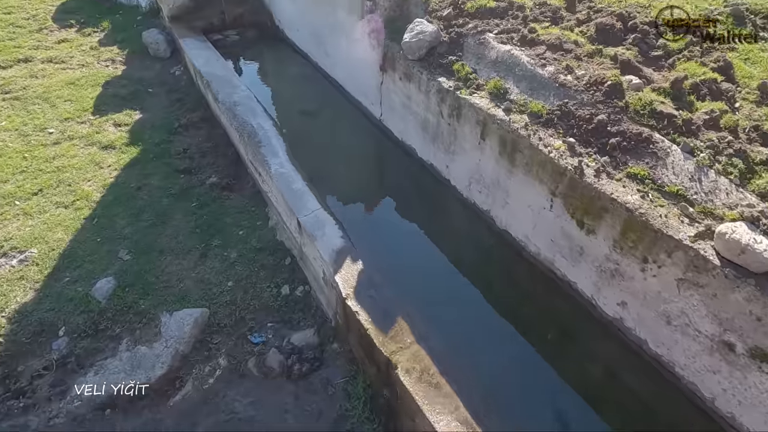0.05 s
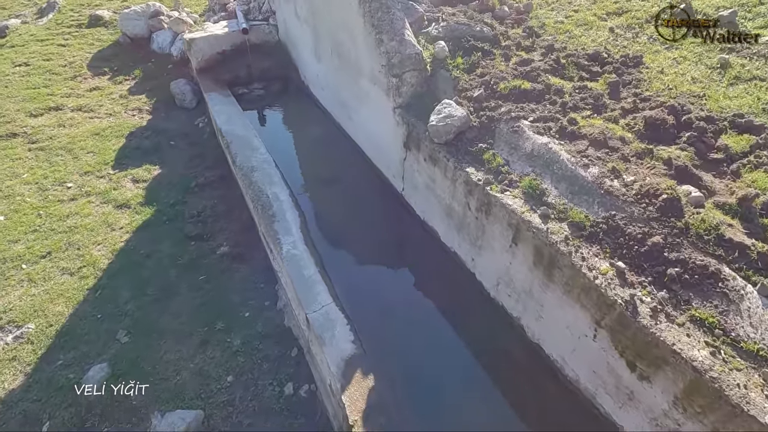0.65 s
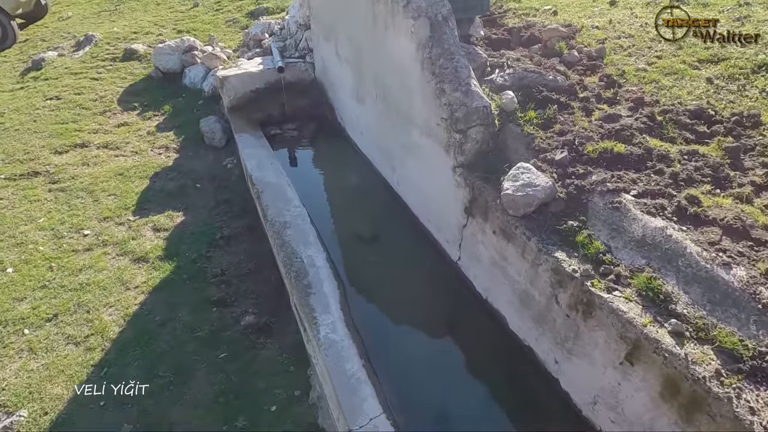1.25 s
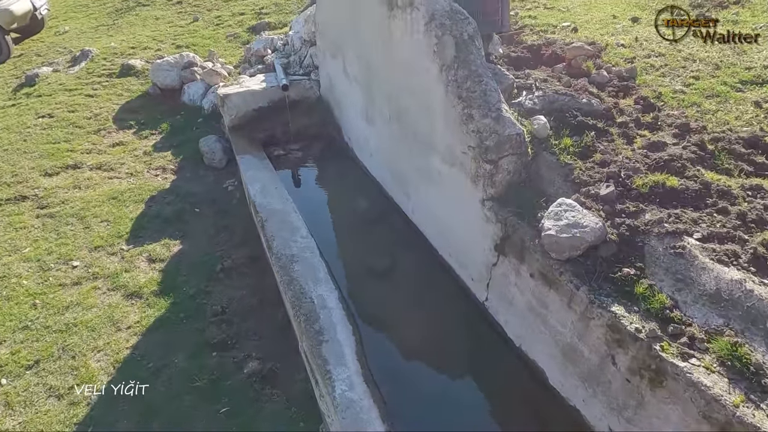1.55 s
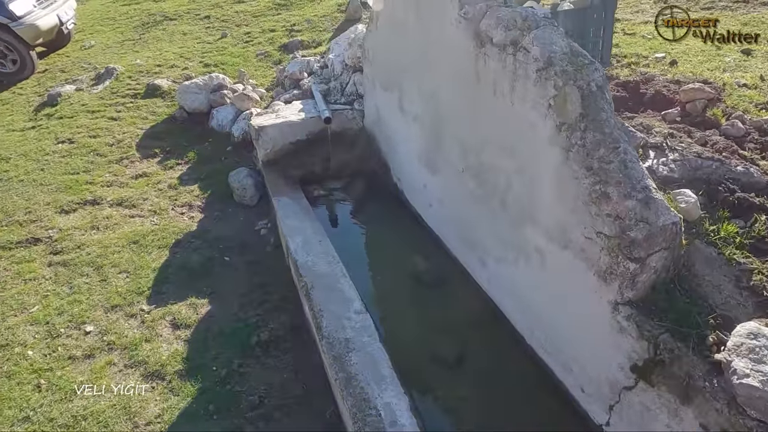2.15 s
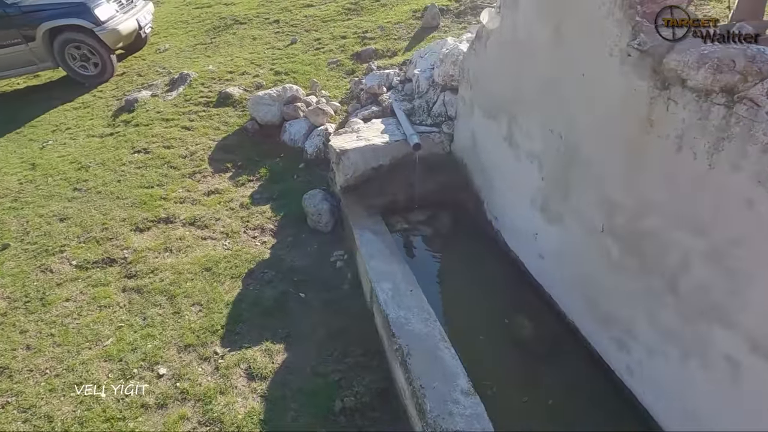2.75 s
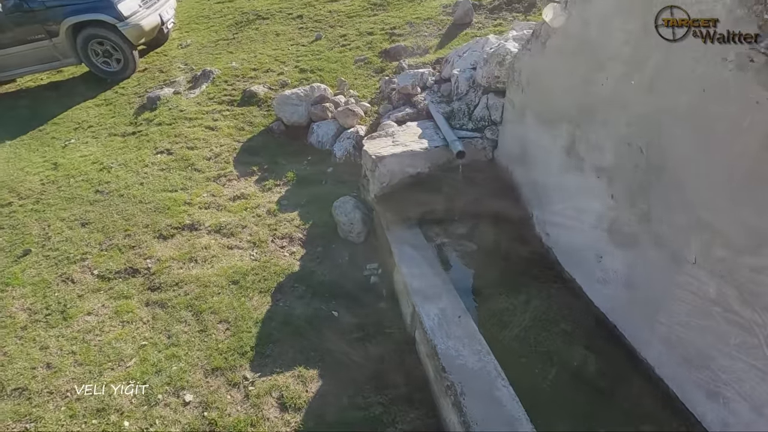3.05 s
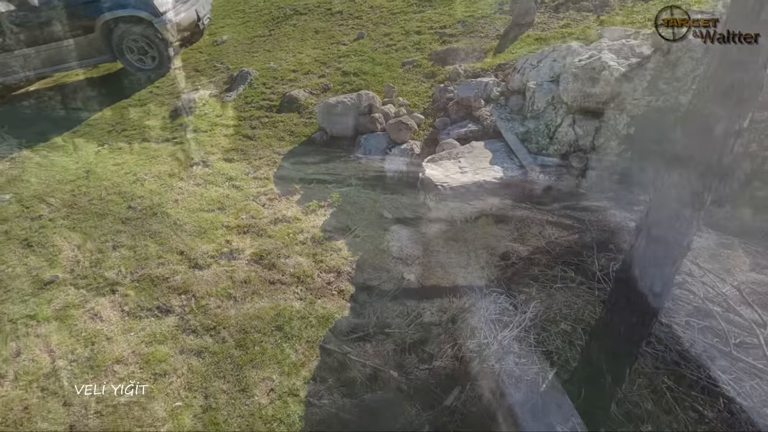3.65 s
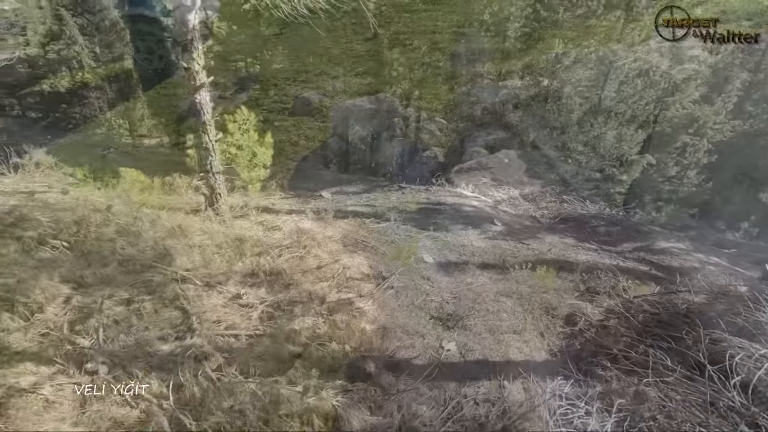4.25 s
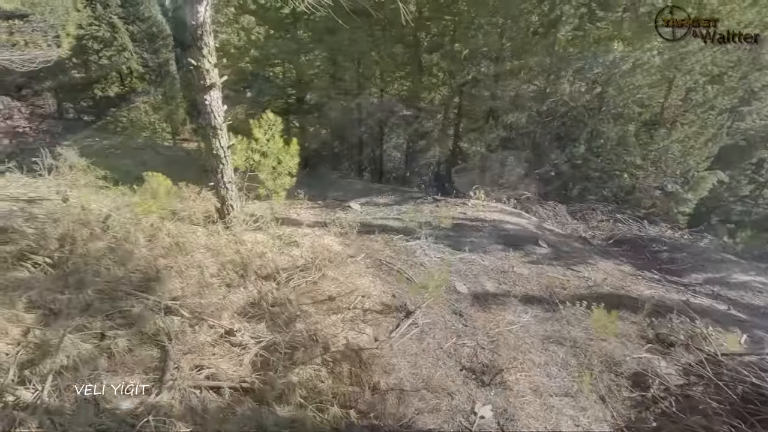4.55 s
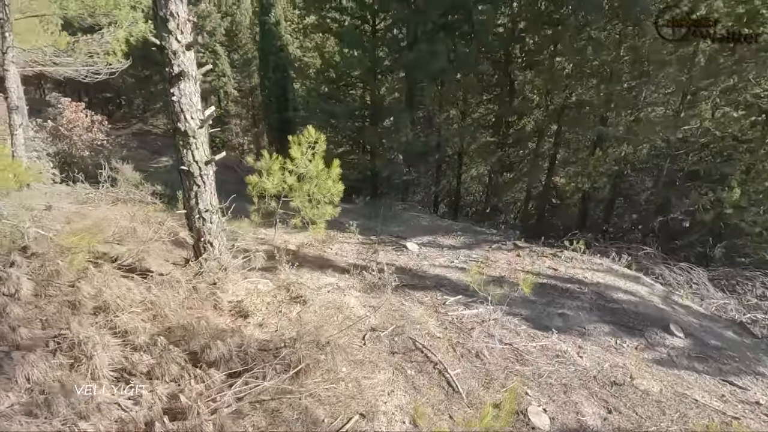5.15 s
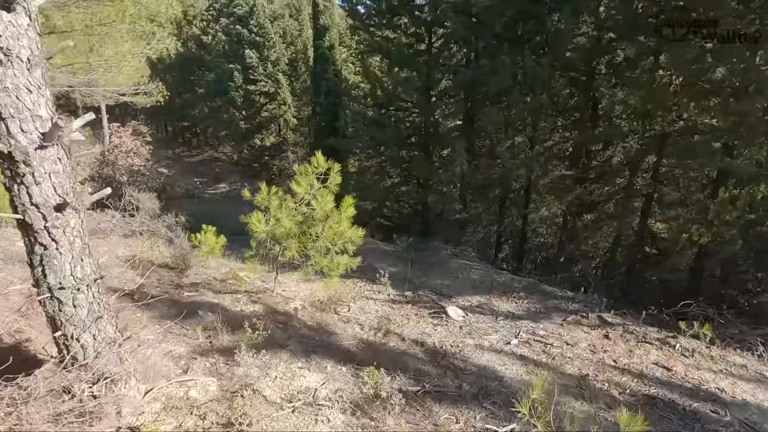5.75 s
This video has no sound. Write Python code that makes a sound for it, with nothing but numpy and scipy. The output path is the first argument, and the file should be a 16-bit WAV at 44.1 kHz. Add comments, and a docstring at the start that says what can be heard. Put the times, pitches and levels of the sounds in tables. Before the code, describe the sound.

A thin stream splashes into a trough, followed by two dog barks and crunching footsteps in a pine wood.

```python
"""Stone trough, then pine wood.

A thin stream from a pipe breaks into blobs that slap the water, throw spray and trap ringing bubbles.
It grows as the microphone nears; a small bird whistles once. The water fades out, a pine wood fades
in: a dog barks twice among echoing trees, wind nudges the microphone, and footsteps crunch on dry
needles and twigs."""
import sys
import numpy as np
from scipy import signal
from scipy.fft import rfft, irfft, next_fast_len
from scipy.io import wavfile
from scipy.ndimage import uniform_filter1d, map_coordinates

SR = 44100
rng = np.random.default_rng(int(sys.argv[2]) if len(sys.argv) > 2 else 0)


def transcribe(u):
    """Save the signal u as a 16-bit wav file named by the first command-line argument.

    u: samples, shape (n,) or (channels, n), limited to [-1, 1]; the rate is SR.
    q: integer samples, one column per channel.
    """
    v = np.clip(np.atleast_2d(u).T, -1, 1)
    q = np.round(v * 32767).astype(np.int16)
    wavfile.write(sys.argv[1], SR, q)


N = 256220
TIME = np.arange(N) / SR

# approach to the pipe: time_s, nearness_db
APPROACH = [(0, -3.5), (0.55, 0), (0.95, -0.5), (1.4, -2), (2.0, 1), (2.5, 2.5), (3.0, 4.5), (3.22, 6.5),
            (3.36, 5), (3.9, 5.5)]
# biggest blobs: start_s, size_db, ring_hz, spray_db
BIG_SPLASHES = [(0.2558, -59, 3300, -78), (0.2902, -53, 3340, -82), (0.375, -52, 4300, -83),
                (0.559, -51, 4570, -64.5), (0.6084, -49.5, 2130, -67), (0.7983, -49, 2290, -84),
                (0.9188, -54, 2480, -69), (0.937, -53, 4020, -67), (0.9595, -39.5, 2385, -66),
                (1.048, -55, 1980, -70), (1.1206, -48.5, 2220, -65.5), (1.16, -53, 3250, -76),
                (1.2018, -52, 3250, -70), (1.239, -54, 3150, -78), (1.271, -53.5, 1950, -72),
                (1.343, -46.5, 3410, -83), (1.3793, -54, 3120, -89), (1.4335, -52, 3270, -90),
                (1.4568, -49, 2580, -84), (1.4694, -52.5, 3030, -81), (1.5269, -55, 3460, -87),
                (1.558, -50, 3500, -83), (1.704, -65, 3040, -70), (1.7459, -43.5, 3130, -76),
                (1.7823, -41, 3190, -66), (2.1919, -42, 3160, -68), (2.2787, -46.5, 2760, -71),
                (2.3637, -46.5, 2730, -69), (2.4065, -45.5, 2840, -75), (2.4467, -56, 2730, -87),
                (2.4663, -46.5, 3660, -86), (2.6175, -43.5, 3540, -73), (2.685, -47.5, 3620, -71),
                (2.722, -46, 3600, -75), (2.785, -46, 3460, -77), (2.847, -43.5, 3600, -76),
                (2.909, -46.5, 3450, -81), (2.92, -44, 3390, -85), (3.12, -46, 3970, -70),
                (3.124, -48.5, 3330, -72), (3.2035, -47.5, 3100, -71), (3.233, -48.5, 2990, -77),
                (3.2465, -56, 3060, -68), (3.299, -67, 3380, -71), (3.3951, -47, 2900, -61),
                (3.4397, -57, 3740, -66), (3.485, -50.5, 2830, -82), (3.602, -43, 2730, -82),
                (3.6646, -59, 3480, -69.5), (3.7368, -45.5, 2334, -72), (3.758, -50, 3480, -60)]
# distinct bubbles, from low plops to tiny high plinks: start_s, peak_db, pitch_hz
BUBBLE_RINGS = [(0.184, -52, 2050), (0.219, -54, 7200), (0.336, -55, 5700), (0.375, -41.5, 512),
                (0.512, -42, 403), (0.596, -44.5, 447), (0.701, -45, 1320), (0.765, -42.5, 426),
                (0.869, -49, 2240), (0.883, -38.5, 492), (0.921, -37.5, 470), (0.9602, -37.5, 2360),
                (0.961, -49, 7900), (0.987, -53, 2370), (0.99, -39.5, 376), (1.12, -52, 5125),
                (1.2, -52.5, 5500), (1.213, -60, 5770), (1.155, -45, 440), (1.242, -42.5, 463),
                (1.388, -44.5, 490), (1.344, -50.5, 1960), (1.508, -55, 5125), (1.559, -52, 5160),
                (1.559, -47, 905), (1.562, -47, 1240), (1.68, -50, 1160), (1.744, -50, 1940),
                (1.76, -51, 5340), (1.969, -51.5, 5100), (2.012, -41, 350), (2.019, -51, 1820),
                (2.166, -39.5, 430), (2.241, -48, 1800), (2.319, -40, 384), (2.406, -42.5, 850),
                (2.783, -54, 6160), (2.871, -42.5, 830), (3.026, -48, 2240), (3.043, -38, 980),
                (3.146, -38.5, 500), (3.248, -35, 506), (3.394, -51, 6350), (3.409, -57, 7540),
                (3.479, -43, 1076), (3.603, -48, 4100)]
# drifting ring of ordinary blobs: time_s, pitch_hz
BLOB_RING = [(0, 3270), (0.8, 2490), (1.15, 3300), (1.7, 3250), (2.4, 2910), (2.52, 3700), (2.9, 3380),
             (3.3, 3240), (3.8, 3740)]
# crowds of bursting bubbles: start_s, end_s, level_db, middle_hz
BUBBLE_FLURRIES = [(0.02, 0.21, -66, 2000), (0.121, 0.316, -70, 4600), (0.353, 0.405, -70, 4340),
                   (0.732, 0.82, -68, 4380), (0.827, 1.008, -65, 2410), (1.633, 1.705, -64.5, 1700),
                   (2.607, 2.65, -71, 7900), (2.678, 2.94, -71.5, 3500), (3.34, 3.553, -77.5, 9070),
                   (3.359, 3.628, -67, 1470), (3.584, 3.615, -58, 3420), (3.724, 3.759, -60, 3980)]
# air dragged under, hissing as foam: start_s, end_s, level_db
FOAM_SPELLS = [(0.325, 0.707, -61.5), (0.663, 0.984, -60.5), (1.63, 1.76, -61.5), (1.74, 2.27, -61),
               (2.58, 3.206, -65)]
# spectra of the water layers: freq_hz, gain_db
GURGLE_EQ = [(60, -5.5), (100, -5.5), (145, 1.5), (195, -3.5), (262, 2.5), (315, -2), (480, -2.5),
             (570, -8.5), (720, -3.5), (950, -13.5), (1400, -22.5)]
CHURN_EQ = [(90, -10.5), (145, 5), (192, -9.5), (232, 8), (275, 6.5), (320, -4.5), (420, -10), (505, 6.5),
            (560, -2.5), (730, 2.5), (1000, -4.5), (1280, -11.5), (1420, -23), (1700, -30)]
SPLATTER_EQ = [(900, -14.5), (1500, -1), (2200, -2.5), (2700, -2.5), (3400, -3), (4400, -4.5), (5500, -8.5),
               (6800, -22.5), (9000, -38)]
SPRAY_EQ = [(4000, -19.5), (5600, 7), (6800, 4.5), (8000, 5.5), (10000, 3), (11200, -4), (12600, 3.5),
            (15000, -18)]
FOAM_EQ = [(600, 4.5), (1500, -4), (2300, 1), (3400, 1), (4500, -6), (5400, -10.5), (6800, -23.5),
           (8200, -17.5), (10000, -20.5), (14000, -24)]
# directional part of the spray: freq_hz, gain_db
SPARKLE_EQ = [(3400, -39.5), (4300, -7), (5400, -31), (7500, -10.5), (9800, 0), (11500, -5), (13000, 2)]
# reflections off rough wall and trough: freq_hz, gain_db
WALL_EQ = [(1500, -22), (2300, -6), (3600, -6), (4500, -12), (5800, -10), (8000, -16), (11000, -28)]
TROUGH_EQ = [(3000, -0.5), (8000, -2.5)]
# wall reflection, later as the pipe nears: time_s, lag_s
WALL_LAG = [(0, 0.00092), (1.4, 0.00091), (2.2, 0.001), (2.45, 0.0012), (2.9, 0.0013), (3.3, 0.00137),
            (3.6, 0.0017), (3.9, 0.0014)]

# one contour per bark: time_s, effort_db, pitch_hz, roughness
BARK_CONTOURS = [
    [(4.066, -91, 717, 0.5), (4.088, -57.5, 707, 0.6), (4.102, -43, 697.5, 0.37), (4.122, -35.5, 683, 0.22),
     (4.148, -38, 651, 0.4), (4.166, -40, 586, 0.44), (4.184, -44, 565, 0.9), (4.215, -59, 472, 1.2)],
    [(4.44, -74, 600, 0.79), (4.475, -51, 634.5, 0.35), (4.494, -46, 650.3, 0.45), (4.508, -46, 905, 0.75),
     (4.522, -45, 1001, 0.45), (4.548, -42, 1009, 0.2), (4.56, -42.5, 1002, 0.3), (4.581, -47.5, 682, 0.8),
     (4.605, -53, 567, 0.7)],
]
# dog's throat resonances: centre_hz, width_hz, gain_db
FORMANTS = [(667, 130, 2.5), (980, 340, -0.5), (1290, 200, -2), (1720, 285, -0.5), (2025, 120, -8)]
# air in the open mouth: freq_hz, gain_db
RASP_EQ = [(300, -34), (500, -6.5), (660, 2), (880, -1.5), (1250, 1), (1520, -8.5), (1830, 0), (2150, -11),
           (2600, -21), (5000, -52)]
# reverberation of the wood: freq_hz, t60_s
WOOD_DECAY = [(300, 0.44), (650, 0.57), (1000, 0.58), (2000, 0.7), (5000, 0.42)]
# echoes off the slope and the wood's edge: lag_s, gain_db
FAR_ECHOES = [(0.11, -17), (0.172, -24), (0.283, -24)]
# their spectrum: freq_hz, gain_db
ECHO_EQ = [(600, -1.5), (1000, -5), (2000, -4)]

# feet through the litter: start_s, length_s, scuff_db, needles_db
FOOT_STROKES = [(4.106, 0.04, -62, -74.5), (4.154, 0.21, -60.5, -92), (4.38, 0.13, -56, -70),
                (4.495, 0.13, -59, -98), (4.66, 0.19, -67, -92), (4.924, 0.06, -63, -83),
                (4.979, 0.03, -58, -59.5), (5.035, 0.051, -61, -80), (5.155, 0.13, -65, -93.5),
                (5.283, 0.068, -60, -85), (5.367, 0.035, -58, -84), (5.461, 0.16, -66.5, -107),
                (5.718, 0.017, -74, -70), (5.728, 0.041, -62, -79)]
# snapping twigs: start_s, peak_db, pitch_hz
TWIG_SNAPS = [(4.385, -44, 2450), (4.499, -39, 8900), (4.992, -30, 2780), (5.002, -40, 1910),
              (5.054, -42.5, 2570), (5.079, -41, 1880), (5.094, -39, 2380), (5.21, -42.5, 1690),
              (5.301, -38.5, 1160), (5.319, -36, 1050), (5.391, -49, 2800), (5.408, -46, 2200),
              (5.42, -38.5, 1410), (5.45, -46, 2130), (5.465, -47.5, 2920), (5.475, -47, 1830),
              (5.733, -35, 1080), (5.761, -44, 1690)]
# footfalls and handling jolts: start_s, peak_db, pitch_hz, decay_s, crunch_relative_db
FOOT_THUDS = [(4.124, -36, 400, 0.0054, -29), (4.769, -51, 260, 0.0055, -15),
              (4.948, -37.5, 200, 0.0057, -30), (4.99, -17, 192, 0.00099, -29.5),
              (5.0, -24.5, 430, 0.0015, -26.5), (5.301, -32.5, 650, 0.0007, -34),
              (5.331, -34.5, 114, 0.013, -25), (5.334, -35.5, 440, 0.0014, -28),
              (5.418, -35.5, 670, 0.00068, -19.5), (5.712, -42, 220, 0.0028, -21.5),
              (5.731, -43, 680, 0.0017, -7.5), (5.764, -33, 81, 0.022, -33), (5.778, -43, 434, 0.0028, -14)]
# spectra of soles and dry needles: freq_hz, gain_db
SCUFF_EQ = [(100, -6), (250, 6.5), (480, 13.5), (800, 13), (1300, 9.5), (2000, 1), (3500, 2.5),
            (4700, -9.5), (5800, -18), (12000, -40)]
NEEDLES_EQ = [(2000, -6), (4500, 8.5), (7000, 4), (10000, 1), (13000, -4), (15500, -20)]

# bird's whistle: time_s, level_db
WHISTLE_LEVEL = [(2.24, -75), (2.28, -72), (2.335, -56), (2.358, -69), (2.38, -59), (2.44, -61.5),
                 (2.5, -58), (2.53, -72), (2.64, -77)]
# wind rumble: freq_hz, gain_db
WIND_EQ = [(10, -2), (25, 2), (40, -3), (75, -8.5), (120, -17), (170, -21.5), (250, -28), (600, -36),
           (2000, -80.5)]
# gusts: middle_s, level_db, half_width_s
WIND_GUSTS = [(0.03, -48, 0.15), (0.38, -49.5, 0.08), (0.57, -40, 0.045), (1.101, -55.5, 0.18),
              (1.8, -55.5, 0.13), (2.04, -53, 0.062), (2.4, -57, 0.049), (3.16, -49, 0.16),
              (4.14, -51, 0.021), (4.37, -46, 0.18), (4.701, -46, 0.17), (4.9, -46, 0.029),
              (5.01, -38, 0.055), (5.299, -42.5, 0.084), (5.774, -39.5, 0.035)]
# the wood slides from left to centre: time_s, left_minus_right_db
WOOD_PAN = [(4.04, 16.5), (4.15, 15), (4.4, 12), (4.6, 9), (4.8, 5.5), (4.92, 1)]

WATER_OUT_S, WOOD_IN_S = (3.366, 3.949), (4.055, 4.13)
SPLATTER_FOLLOW, SPRAY_FOLLOW = 0.1, 0.05  # dB per dB of nearness


def water():
    """The stream in the trough: big and ordinary blobs within a trickle."""
    splashes, plops = blobs()
    splashes, plops = list(BIG_SPLASHES) + splashes, list(BUBBLE_RINGS) + plops
    return facing(trough(trickle(splashes) + flurries() + drops(splashes, plops)))


def blobs(count=140, rate_hz=25, jitter=0.3, spread_db=3.5, cushion_db=-1, pocket_share=0.65):
    """Splash and plop rows: blobs fall at a loose beat, foam cushions them, some drive air under."""
    gap, size, pitch, mist, depth, pocket = rng.standard_normal((count, 6)).T
    traps_air = rng.random(count) < pocket_share
    start_s = np.cumsum(np.exp(jitter * gap)) / rate_hz
    near_db = curve(APPROACH, start_s)
    heard = start_s < WATER_OUT_S[1]
    on_foam = np.any([(start_s > start) & (start_s < end) for start, end, _ in FOAM_SPELLS], axis=0)
    size_db = spread_db * np.minimum(size, 1.5) + cushion_db * on_foam
    blob_db = -56 + size_db + SPLATTER_FOLLOW * near_db
    spray_db = -76.5 + size_db + 4.3 * mist + SPRAY_FOLLOW * near_db
    ring_hz = curve(BLOB_RING, start_s) * 2 ** (0.08 * pitch)
    pocket_db = -46.5 + 0.44 * depth - 0.69 * near_db
    pocket_hz = 430 * 2 ** (0.097 * pocket)
    splashes = np.array([start_s, blob_db, ring_hz, spray_db]).T
    plops = np.array([start_s, pocket_db, pocket_hz]).T
    return list(splashes[heard]), list(plops[heard & traps_air])


def drops(splashes, plops, rise_s=0.0014, fall_s=0.0026, slap_db=-3.5, plink_db=-3, crest_db=10):
    """Each blob slaps the surface, throws spray and traps a plinking bubble; others ring below."""
    below, surface = np.zeros((2, N))
    t = TIME[:1500]
    for start_s, db, hz, spray_db in splashes:
        slap = rng.standard_normal(len(t)) * (1 - np.exp(-(t / rise_s) ** 2)) * np.exp(-t / fall_s)
        slap = coloured(resonate(slap, hz, width_hz=1700), SPLATTER_EQ)
        add(surface, start_s, gain_of(db + slap_db) * unit_peak(slap))
        add(surface, start_s, gain_of(spray_db + crest_db) * droplets())
        add(below, start_s, gain_of(db + plink_db) * ring(hz, cycles=9, rise=0.008, attack=6))
    for start_s, db, hz in plops:
        cycles = 2.01 * (hz / 450) ** 0.41  # smaller bubbles ring for more cycles
        add(below, start_s, gain_of(db) * ring(hz, cycles, rise=0.014, attack=0.51 * cycles))
    return below + off_wall(surface)


def droplets(count=26, low_hz=5000, high_hz=13500, span_s=0.008, tick_s=0.0013):
    """One blob's spray: a dry contact tick among tiny pings, peak 1."""
    t = TIME[:1500]
    pings = np.zeros(len(t))
    for pitch, early, late, size in rng.random((count, 4)):
        hz = low_hz * (high_hz / low_hz) ** pitch
        add(pings, span_s * early * (1 + late) / 2, size * ring(hz, cycles=6, rise=0.01, attack=4))
    tick = rng.standard_normal(len(t)) * np.exp(-abs(t - span_s / 2) / tick_s)
    return unit_peak(coloured(unit_peak(pings) + gain_of(-3) * unit_peak(tick), SPRAY_EQ))


def trickle(splashes):
    """Clouds of bubbles and droplets over foam; the higher ones thicken around each blob."""
    gush = gush_gain(splashes)
    gurgle = grains(94, 1074, per_s=1500, spread_db=2, cycles=2.01, rise=0.17, attack=0.91)
    churn = grains(117, 1566, per_s=5000, spread_db=-1, cycles=4.7, rise=0.057, attack=1.15)
    bubbles = grains(916, 1200, per_s=990, spread_db=10, cycles=1.4, rise=0.041, attack=0.75)
    splatter = grains(1426, 6620, per_s=2700, spread_db=5.5, cycles=6.2, rise=0.013, attack=1.2)
    spray = grains(5500, 14000, per_s=5000, spread_db=3.6, cycles=3.5, rise=0.015, attack=3)
    hiss = foam()
    clumps = lumps(spread_db=1.98, length_s=0.027)
    return (nearer(-55.5, follow=0.84) * steadied(coloured(gurgle, GURGLE_EQ) * clumps)
            + nearer(-63.5, follow=2.44) * steadied(coloured(churn, CHURN_EQ))
            + nearer(-74.5, follow=1.54) * steadied(bubbles * gush)
            + nearer(-68, SPLATTER_FOLLOW) * steadied(off_wall(coloured(splatter, SPLATTER_EQ) * gush))
            + nearer(-69.5, follow=0.25) * patter(gush)
            + nearer(-78.5, SPRAY_FOLLOW) * steadied(coloured(spray, SPRAY_EQ) * gush)
            + hiss)


def gush_gain(splashes, boost=3.9, decay_s=0.0021):
    """Burst of droplets around each blob, stronger for big ones."""
    start_s, db = np.transpose(splashes)[:2]
    kicks = np.zeros(N)
    kicks[np.clip(np.round(start_s * SR).astype(int), 0, N - 1)] = np.sqrt(gain_of(db - db.max()))
    lag_s = np.arange(-1500, 1501) / SR
    return 1 + boost * signal.oaconvolve(kicks, np.exp(-abs(lag_s) / decay_s), "same")


def patter(gush):
    """Tiny bubbles crowd around each blob and ring near its pitch."""
    pops = grains(2200, 4600, per_s=700, spread_db=5.5, cycles=1.2, rise=0, attack=0.3, count=8)
    return steadied(resonate_twice(pops * gush, curve(BLOB_RING), width_hz=600))


def flurries(count=14, pitch_ratio=1.186, rise_s=0.0068, fall_s=0.0084):
    """Short crowds of bubbles of about one size."""
    out, t = np.zeros(N), TIME[:SR // 2]
    for start_s, end_s, db, middle_hz in BUBBLE_FLURRIES:
        crowd = np.zeros(len(t))
        for hz in np.geomspace(middle_hz / pitch_ratio, middle_hz * pitch_ratio, count):
            pops = sparse_noise(len(t), chance=middle_hz / 40 / SR)
            crowd += signal.oaconvolve(pops, ring(hz, cycles=6, rise=0.01, attack=2))[:len(t)]
        envelope = spell(0, end_s - start_s, rise_s, fall_s)[:len(t)]
        add(out, start_s, gain_of(db) * envelope * steadied(crowd, size=1800))
    return out


def foam(rest_db=-74.5, rise_s=0.012, fall_s=0.064):
    """Hiss that swells while the stream drags air under."""
    hiss = unit_rms(coloured(rng.standard_normal(N), FOAM_EQ))
    swells = [gain_of(db) * spell(start, end, rise_s, fall_s) for start, end, db in FOAM_SPELLS]
    return np.maximum(np.max(swells, axis=0), gain_of(rest_db)) * hiss


def off_wall(x):
    """One close reflection cuts the sound into bands, which sink as the lag grows."""
    return x + map_coordinates(coloured(x, WALL_EQ), [(TIME - curve(WALL_LAG)) * SR], order=3)


def trough(x, patterns=6, t60_s=0.17):
    """Short, shifting reflections off the stone sides; several echo patterns alternate at random."""
    t = TIME[:4000]
    pattern = rng.integers(0, patterns, N // 1024 + 1)[np.arange(N) // 1024]
    echoes = np.zeros(N)
    for k in range(patterns):
        taps = sparse_noise(len(t), chance=0.03) * (t > 0.003) * gain_of(-60 * t / t60_s)
        active = uniform_filter1d(1. * (pattern == k), size=256)
        echoes += signal.oaconvolve(x * active, taps / np.linalg.norm(taps))[:N]
    return x + gain_of(-7.5) * coloured(echoes, TROUGH_EQ)


def facing(x, turn_s=(2.65, 3.6), away_db=-8.5, facing_db=5):
    """The finest spray comes up as the microphone turns to the pipe."""
    sparkle_gain = gain_of(np.interp(TIME, turn_s, [away_db, facing_db]))
    return x + (sparkle_gain - 1) * coloured(x, SPARKLE_EQ)


def nearer(base_db, follow):
    """Layer gain, rising by follow dB per dB of nearness."""
    return gain_of(base_db + follow * curve(APPROACH))


def dog(scatter_db=-7):
    """Barks, scattered by the trunks, with a few distinct echoes."""
    direct = np.zeros(N)
    for contour in BARK_CONTOURS:
        add(direct, *bark(contour))
    taps = sparse_noise(SR, chance=0.04) * (TIME[:SR] > 0.025)
    hz, t, spectra = signal.stft(taps, SR, nperseg=256)
    decay = gain_of(-60 * t / at_hz(WOOD_DECAY, hz)[:, None])
    tail = signal.istft(spectra * decay, SR, nperseg=256)[1]
    out = direct + gain_of(scatter_db) * signal.fftconvolve(direct, tail / np.linalg.norm(tail))[:N]
    for lag_s, db in FAR_ECHOES:
        add(out, lag_s, gain_of(db) * coloured(direct, ECHO_EQ))
    return out


def bark(contour):
    """Start time and sound of a yelp turning hoarse: harmonics through the throat, plus puffs of air."""
    time_s, *columns = np.transpose(contour)
    t = np.arange(time_s[0], time_s[-1], 1 / SR)
    effort_db, hz, rough = (np.interp(t, time_s, column) for column in columns)
    rough = np.clip(rough, 0.12, 1)
    jitter, air, shimmer = rng.standard_normal((3, SR))[:, :len(t)]
    turns = np.cumsum(hz * (1 + 0.09 * rough ** 1.5 * wobble(jitter, size=90))) / SR
    folds = sum(gain_of(-4.5 * k) * np.cos(2 * np.pi * (k + 1) * turns) for k in range(3))
    folds *= 1 + 0.64 * rough * np.cos(np.pi * turns)  # alternate pulses are weaker
    folds *= 1 + 0.7 * rough * wobble(shimmer, size=120)
    tone = sum(gain_of(db) * resonate_twice(folds, centre, width) for centre, width, db in FORMANTS)
    puffs = (0.37 + np.exp(-(turns % 1) / 0.26)) * air
    growl = resonate_twice(puffs, hz, width_hz=170)
    rasp = unit_rms(coloured(puffs, RASP_EQ)) + 0.6 * unit_rms(growl)
    voice = np.sqrt(1 - rough ** 2) * steadied(tone, size=900) + rough * unit_rms(rasp)
    return time_s[0], gain_of(effort_db) * voice * signal.windows.tukey(len(t), 0.12)


def footsteps(rustle_db=-74.5, rise_s=0.017):
    """Soles scuff and thud, needles crackle, twigs snap."""
    drag = gain_of(1.5 * wobble(rng.standard_normal(N), size=300))
    scuff = coloured(rng.standard_normal(N), SCUFF_EQ) * drag
    needles = grains(3000, 14500, per_s=4500, spread_db=3.6, cycles=1.2, rise=0, attack=0.3)
    scuff_gain, needles_gain = gain_of(rustle_db), 0
    for start_s, length_s, scuff_db, needles_db in FOOT_STROKES:
        stroke = (start_s, start_s + length_s, rise_s)
        scuff_gain = np.hypot(scuff_gain, gain_of(scuff_db) * spell(*stroke, fall_s=0.024))
        needles_gain = np.hypot(needles_gain, gain_of(needles_db) * spell(*stroke, fall_s=0.027))
    out = scuff_gain * unit_rms(scuff) + needles_gain * steadied(coloured(needles, NEEDLES_EQ))
    for start_s, db, hz in TWIG_SNAPS:
        add(out, start_s, gain_of(db) * ring(hz, cycles=0.43, rise=0, attack=0.56))
    for start_s, db, hz, decay_s, crunch_db in FOOT_THUDS:
        add(out, start_s, gain_of(db) * thud(hz, decay_s, crunch_db))
    return out


def thud(hz, decay_s, crunch_db):
    """A footfall or jolt: damped knock plus crushed litter."""
    t = TIME[:SR // 6]
    press, crush = rng.standard_normal((2, len(t))) * (1 - np.exp(-t / 0.00012))
    crunch = unit_rms(coloured(press, SCUFF_EQ)) * np.exp(-t / 0.02)
    litter = unit_rms(coloured(crush, NEEDLES_EQ)) * np.exp(-t / 0.032)
    out = gain_of(crunch_db) * (crunch + gain_of(-19) * litter)
    add(out, 0, ring(hz, cycles=decay_s * hz, rise=0, attack=0.015))
    return out


def bird(pitch_hz=2708):
    """One thin whistle that wavers and trails off."""
    hz = pitch_hz * (1 + 0.003 * wobble(rng.standard_normal(N), size=400))
    flutter = lumps(spread_db=1.8, length_s=0.01)
    singing = (TIME >= WHISTLE_LEVEL[0][0]) & (TIME <= WHISTLE_LEVEL[-1][0])
    envelope = uniform_filter1d(1. * singing, size=400) * gain_of(curve(WHISTLE_LEVEL))
    return envelope * flutter * np.sqrt(2) * np.sin(2 * np.pi * np.cumsum(hz) / SR)


def wind(at_trough, in_wood, trough_db=-65, wood_db=-53.5):
    """Low buffets at the microphone, light by the trough, stronger in the wood."""
    buffets = rng.standard_normal(N) * lumps(spread_db=5.5, length_s=0.047)
    rumble = steadied(coloured(buffets, WIND_EQ), size=4000)
    gusts = sum(gain_of(db) * np.exp(-((TIME - s) / width) ** 2) for s, db, width in WIND_GUSTS)
    return rumble * (at_trough * np.hypot(gusts, gain_of(trough_db))
                     + in_wood * np.hypot(gusts, gain_of(wood_db)))


def grains(low_hz, high_hz, per_s, spread_db, cycles, rise, attack, count=24):
    """A cloud of small rings of many pitches and sizes."""
    out = np.zeros(N)
    for hz in np.geomspace(low_hz, high_hz, count):
        place, chance, size, sign = rng.random((1500, 4)).T
        height = gain_of(spread_db * np.minimum(-np.log(1 - size), 4)) * np.sign(sign - 0.5)
        clicks = np.zeros(N)
        clicks[(place * N).astype(int)] = height * (chance < per_s * N / SR / count / len(place))
        out += signal.oaconvolve(clicks, hz * ring(hz, cycles, rise, attack))[:N]
    return out


def ring(hz, cycles, rise, attack):
    """Damped sine; decay and attack in cycles, pitch up by the fraction rise per decay time."""
    turns = np.arange(int(7 * cycles * SR / hz) + 8) * hz / SR
    envelope = np.exp(-turns / cycles) * (1 - np.exp(-(turns / attack) ** 2))
    return unit_peak(envelope) * np.sin(2 * np.pi * turns * (1 + rise * turns / cycles / 2))


def resonate(x, hz, width_hz):
    """Unity-gain resonance; hz may be a curve."""
    carrier = np.exp(2j * np.pi * np.cumsum(hz * np.ones(len(x))) / SR)
    pole = np.exp(-np.pi * width_hz / SR)
    return 2 * (carrier * signal.lfilter([1 - pole], [1, -pole], x / carrier + 1e-18)).real


def resonate_twice(x, hz, width_hz):
    return resonate(resonate(x, hz, width_hz), hz, width_hz)


def coloured(x, eq):
    """Filters by a spectrum table."""
    size = next_fast_len(len(x) + 4096)
    response = gain_of(at_hz(eq, np.fft.rfftfreq(size, 1 / SR)))
    return irfft(rfft(x, size) * response, size)[:len(x)]


def at_hz(rows, hz):
    """Reads a table on a log-frequency axis."""
    freq_hz, value = np.transpose(rows)
    return np.interp(np.log(hz + 1), np.log(freq_hz + 1), value)


def curve(rows, time_s=TIME):
    return np.interp(time_s, *np.transpose(rows))


def ramp(start_s, end_s):
    return np.clip((TIME - start_s) / (end_s - start_s), 0, 1)


def spell(start_s, end_s, rise_s, fall_s):
    """Attack, hold, exponential release."""
    return ramp(start_s, start_s + rise_s) * np.exp(-np.maximum(TIME - end_s, 0) / fall_s)


def lumps(spread_db, length_s):
    """Randomly wandering gain."""
    window = signal.windows.hann(int(2 * length_s * SR) + 3)
    return gain_of(spread_db * unit_rms(signal.oaconvolve(rng.standard_normal(N), window, "same")))


def sparse_noise(size, chance):
    return rng.standard_normal(size) * (rng.random(size) < chance)


def wobble(noise, size):
    return unit_rms(uniform_filter1d(noise, size))


def steadied(x, size=9000):
    """Running rms of 1; keeps the fast grain."""
    return x / np.sqrt(abs(uniform_filter1d(x ** 2, size)) + 1e-12)


def unit_rms(x):
    return x / np.sqrt(np.mean(x ** 2) + 1e-20)


def unit_peak(x):
    return x / abs(x).max()


def gain_of(db):
    return 10 ** (np.asarray(db) / 20)


def add(mix, start_s, sound):
    part = mix[max(round(start_s * SR), 0):][:len(sound)]
    part += sound[:len(part)]


def scene():
    """The trough fades out; the wood fades in, at first on the left."""
    at_trough, in_wood = 1 - ramp(*WATER_OUT_S), ramp(*WOOD_IN_S) ** 2
    mono = at_trough * water() + bird() + dog() + in_wood * footsteps() + wind(at_trough, in_wood)
    left = gain_of(np.interp(TIME, *np.transpose(WOOD_PAN), left=0, right=0))
    return 2 * mono * np.array([left, np.ones(N)]) / (1 + left)


def record(dry):
    """Low-pass at 15 kHz."""
    lowpass = signal.firwin(255, 15000, window=("kaiser", 8), fs=SR)
    return signal.oaconvolve(dry, lowpass[None], "same")


dry = scene()
out = record(dry)
transcribe(out)
```